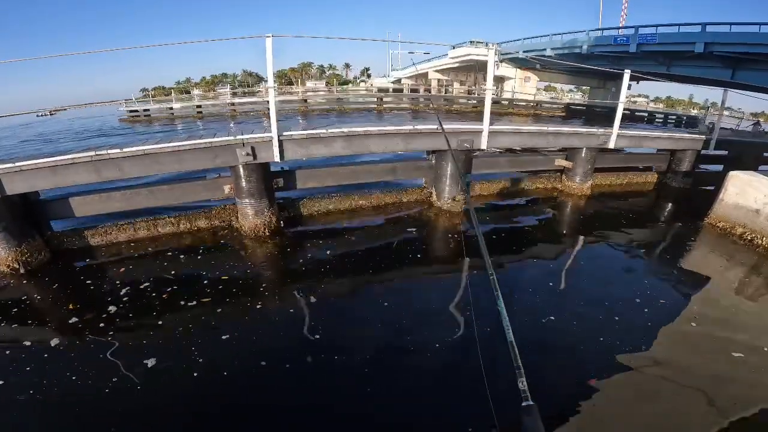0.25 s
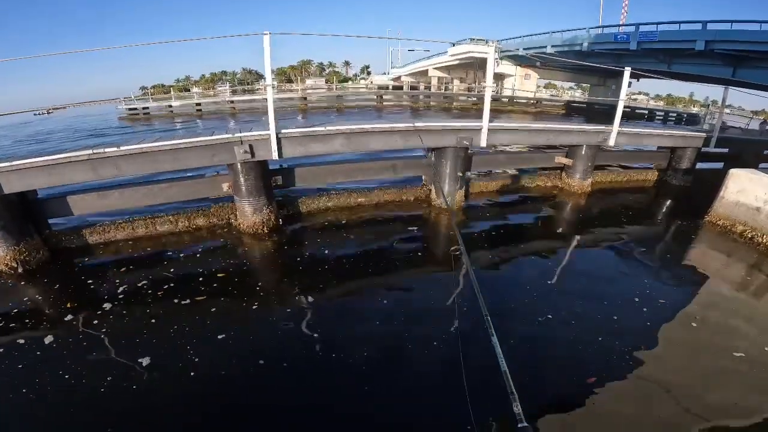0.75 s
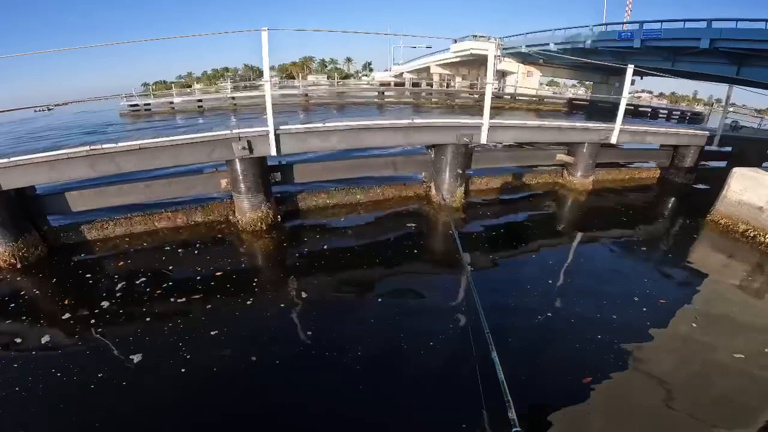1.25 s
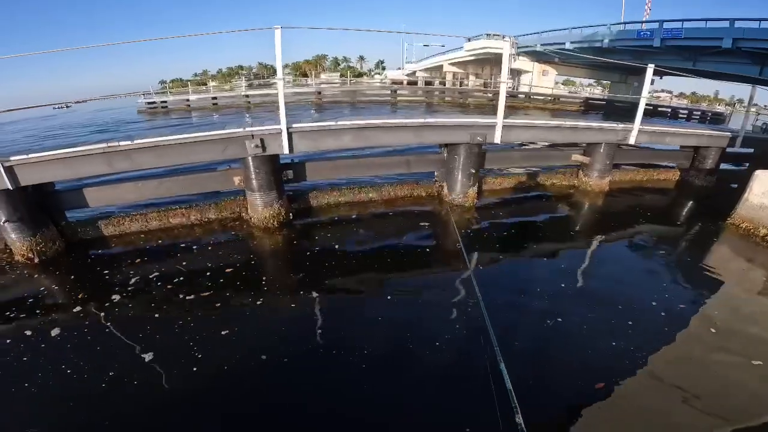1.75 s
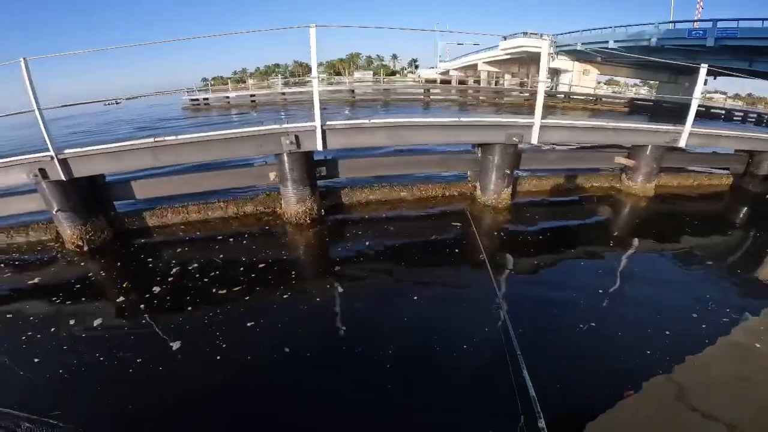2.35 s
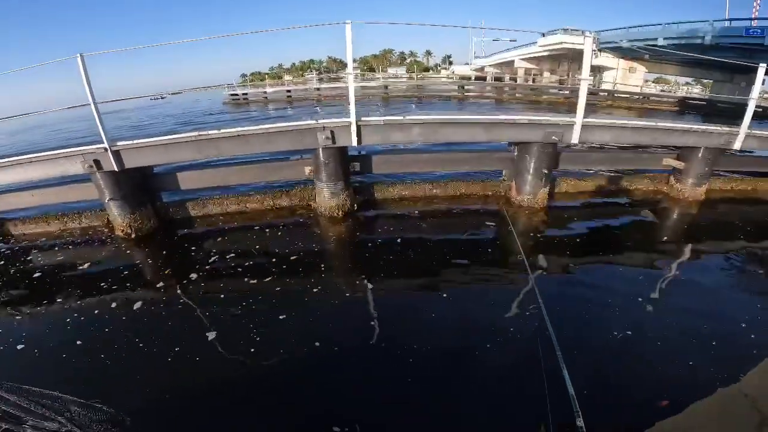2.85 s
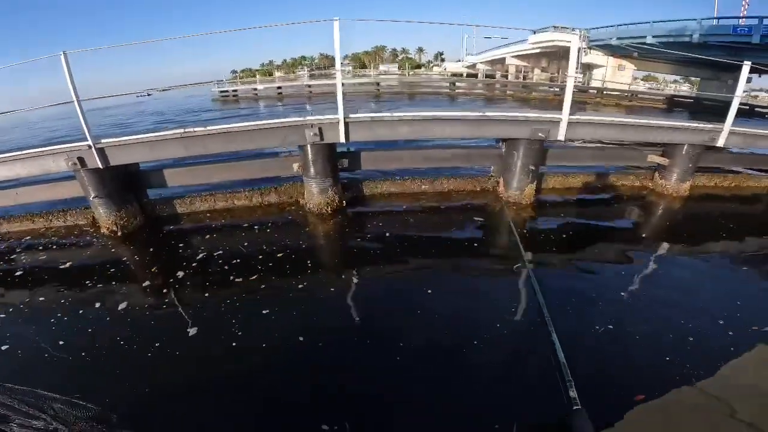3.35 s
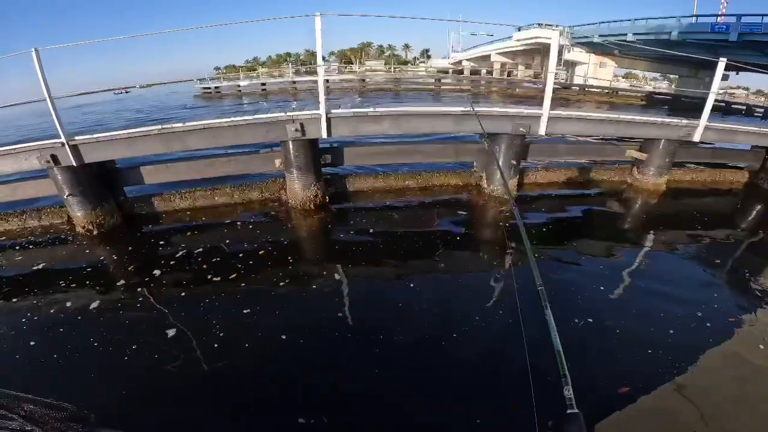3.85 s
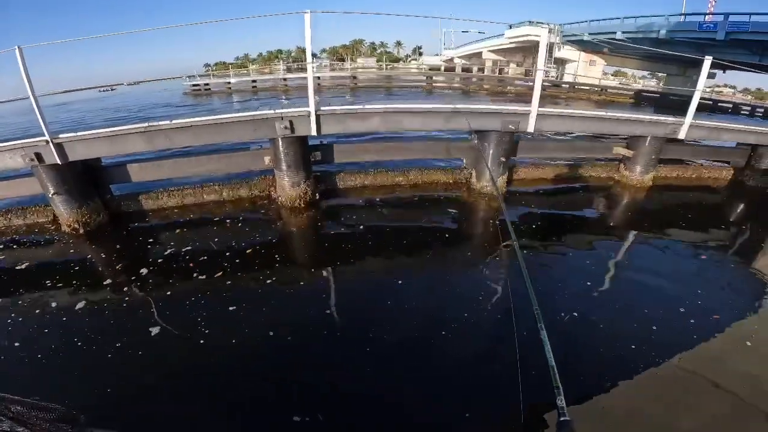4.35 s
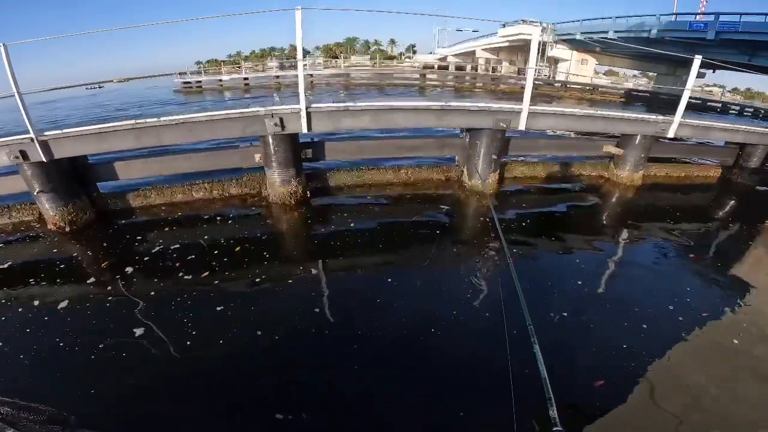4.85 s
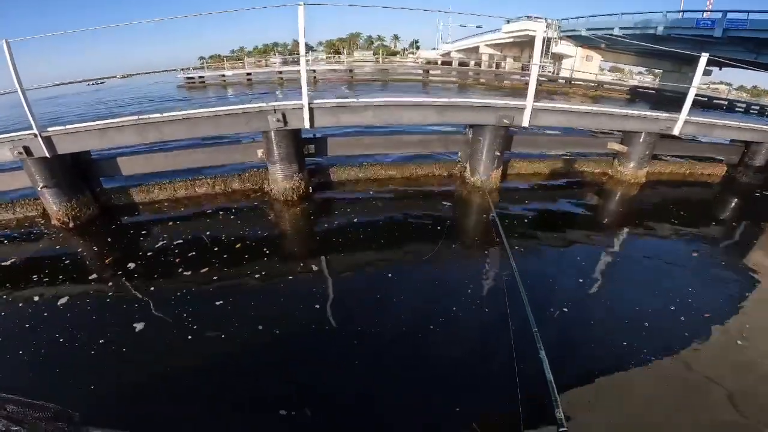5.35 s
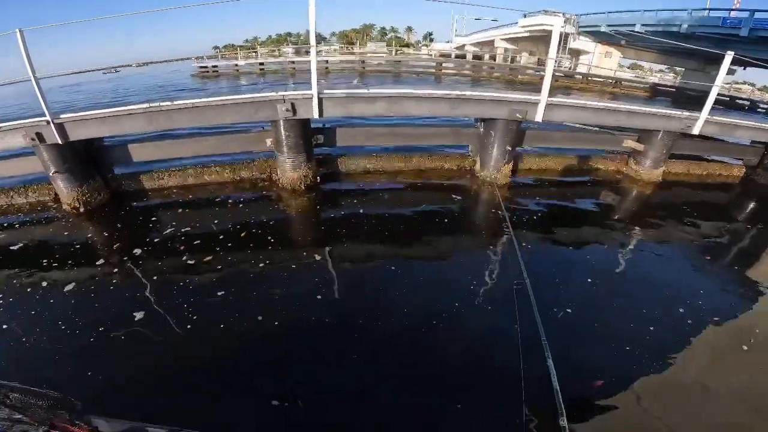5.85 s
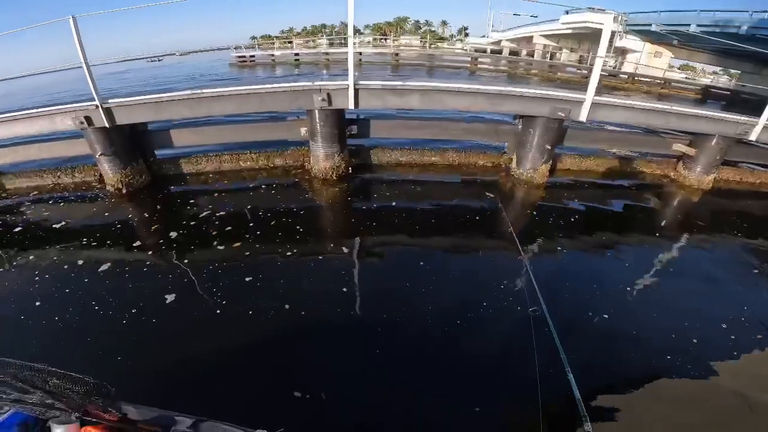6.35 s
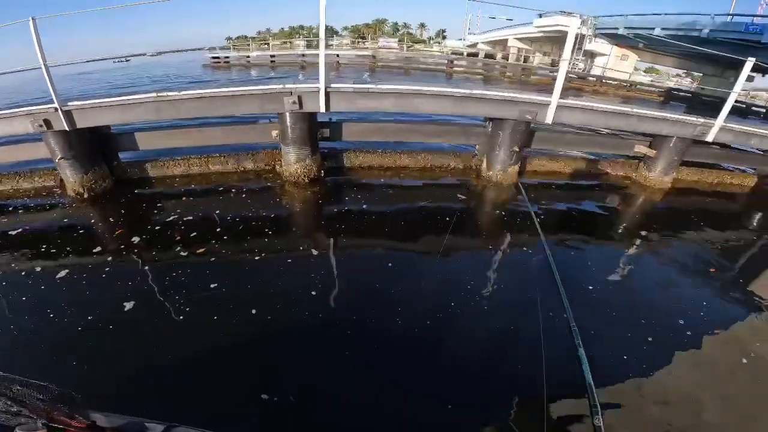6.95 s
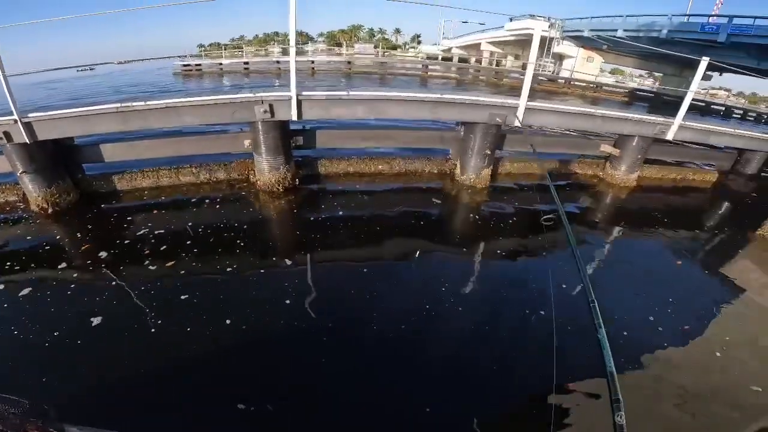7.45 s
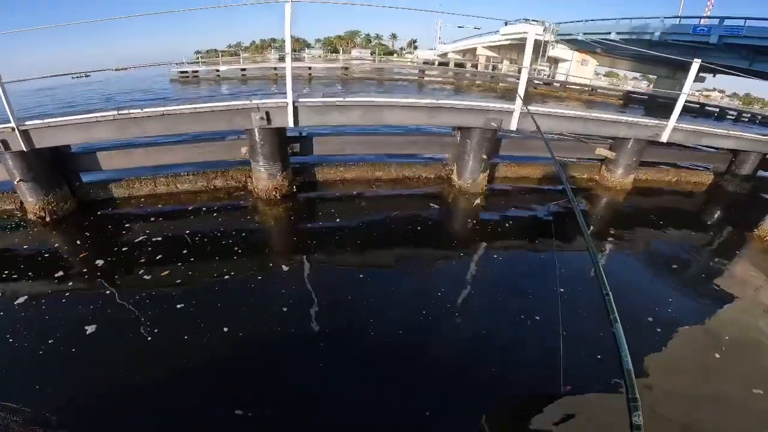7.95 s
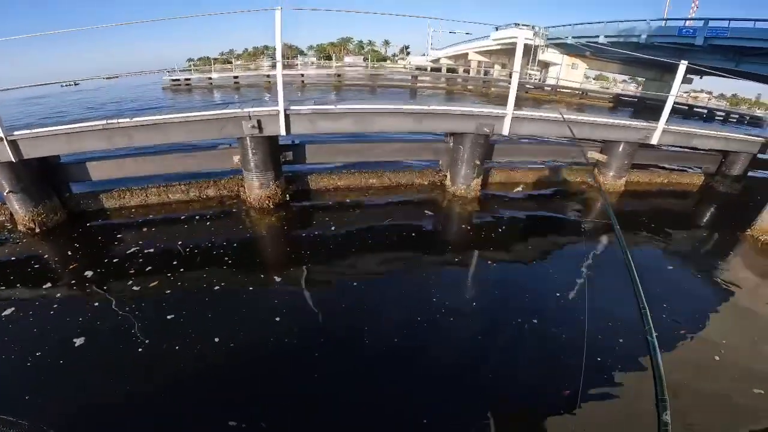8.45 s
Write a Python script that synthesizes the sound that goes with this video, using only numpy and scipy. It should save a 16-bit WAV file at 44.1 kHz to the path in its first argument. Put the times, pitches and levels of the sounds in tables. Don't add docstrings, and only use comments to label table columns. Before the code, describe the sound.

Steady bridge traffic rumbles; one car fades off, a truck bangs over a joint with quickening metallic knocks, while water plips and fishing line ticks nearby.

```python
import sys
import numpy as np
from scipy import signal
from scipy.fft import rfft, irfft, next_fast_len
from scipy.io import wavfile
from scipy.ndimage import uniform_filter1d

SR = 44100
rng = np.random.default_rng(int(sys.argv[2]) if len(sys.argv) > 2 else 0)


def master_out(mix):
    frames = np.transpose(np.atleast_2d(mix))
    ceiling = np.clip(frames, -1, 1)
    pcm = np.round(ceiling * 32767).astype(np.int16)
    wavfile.write(sys.argv[1], SR, pcm)


def gain_from_decibels(decibels):
    exponent = np.asarray(decibels, float) / 20
    return 10 ** exponent


N = 383260
FFT_N = next_fast_len(N)
HZ = np.fft.rfftfreq(FFT_N, 1 / SR)
TIME = np.arange(N) / SR

# time in seconds, load on the deck in dB, nearness in dB.
FAR_PASS = [
    (0, -4, -3.5),
    (2.5, -2, 0),
    (3.2, -0.5, -1),
    (3.75, 1.5, 0),
    (4.3, -3, -.5),
    (4.9, -0.5, 0),
    (5.6, -5, -.5),
    (6.4, -3, 0),
    (8.69, -0.5, 0),
]
CAR_PASS = [
    (0, -0.5, 1),
    (.5, 1, 1),
    (1.1, -3.5, 0),
    (1.9, 0, 0),
    (2.2, 3.5, -4.5),
    (2.6, -6, -13),
    (2.95, -3, -22),
    (3.2, -19, -32),
    (3.4, -22, -35),
]
TRUCK_PASS = [
    (6.63, -22, -17),
    (6.665, -14.5, -5.5),
    (6.85, -6.5, -3.5),
    (7.12, -1.5, -0.5),
    (7.3, -7, -1),
    (7.7, -9, -1),
    (8.3, -2.5, -1),
    (8.5, -4, -5),
    (8.69, -2.5, -12.5),
]

# frequency in Hz, level in dB per Hz.
FAR_ROAR = [(12, -44), (20, -14), (32, -4.5), (60, -9), (91, -9), (117, -4), (141, -14), (396, -24.5),
            (469, -27.5), (828, -28), (920, -24.5), (3050, -38.5), (3960, -57.5), (6710, -120)]
CAR_ROAR = [(12, -33), (20, -8.5), (115, -0.5), (167, -9), (207, -16.5), (244, -12.5), (357, -20),
            (413, -18), (617, -16.5), (777, -21), (1800, -32.5), (3050, -57), (3960, -71), (6710, -120)]
TRUCK_ROAR = [(12, -39.5), (20, -8), (65, -1.5), (141, 1), (215, -12.5), (283, -13), (349, -13),
              (500, -13.5), (567, -12), (617, -12.5), (1730, -24.5), (3050, -53), (3960, -70.5),
              (6710, -120)]
# frequency in Hz, level in dB per Hz.
FAR_HISS = [(2000, -22), (2600, -12), (3200, -9.5), (4000, -12.5), (5500, -16.5), (7600, -21), (8200, -28),
            (10200, -29.5), (11200, -33), (12200, -37), (13500, -36.5), (14000, -51), (14600, -71.5)]
CAR_HISS = [(2000, 9), (2600, -3.5), (3200, -12.5), (4700, -14), (5500, -19), (7600, -26.5), (8200, -31.5),
            (10200, -32.5), (11200, -37), (12200, -36), (13500, -40), (14100, -48), (14700, -69)]
TRUCK_HISS = [(2000, 20), (2600, 3), (3200, -9), (4700, -10.5), (5500, -17), (7600, -27), (8200, -35),
              (10200, -46.5), (13500, -51), (14500, -70.5)]
# frequency in Hz, width in Hz, level in dB.
FAR_HUM = [(930, 85, 0), (705, 70, -4)]
CAR_HUM = [(133, 20, -0.5), (207.3, 15.5, -4), (413.6, 25, -9), (607, 52, -14), (310.4, 15, -12)]
TRUCK_HUM = [(144, 31, 0), (285.4, 46, 1), (434, 45, -4.5), (569, 40, -6.5), (953, 130, -11.5),
             (1763, 73, -15)]
# level in dB at nearness 0, share of nearness, lag in seconds, drift in dB per second.
FAR_MIX = [(-42, 1.6, 0.01, 0.15), (-60.5, 1, 0.01, -0.1), (-58, 0.64, 0.21, 1.05)], -32
CAR_MIX = [(-35.5, 1.42, 0.01, 0.027), (-57.5, 2.1, 0.38, -0.38), (-36.5, 0.75, 0.01, 0.035)], -25.5
TRUCK_MIX = [(-29, 1.09, 0.012, .01), (-53, 1.1, 0.07, 2.86), (-32.5, 1.8, 0.19, 1.7)], -20.5

# frequency in Hz, likeness from 0 to 1, left lead in radians, left over right in dB.
WIDE_PORTS = [(40, .999, 0, 0), (140, .998, 0, 0), (260, .985, 0, -.1), (410, .95, .1, .1),
              (940, .93, .3, .4), (1730, .86, .55, .1), (2900, .6, 1.1, -.2), (3800, .53, .4, -1.6),
              (4900, .72, .05, -1.5), (6500, .72, -.2, .5), (8400, .5, -.4, 1.3), (10000, .78, -.1, 1.1),
              (11500, .5, -.1, 2.5), (12600, .1, -.1, 5)]
NEAR_PORTS = [(40, .999, 0, 0), (100, .9996, 0, 0), (180, .999, 0, -.3), (410, .995, .05, -1.2),
              (650, .99, .05, -1.4), (940, .98, .12, -.6), (1730, .93, .6, -.6), (2300, .85, 1.05, -1.9),
              (2900, .68, 1.1, -2.5), (3800, .75, .4, -3), (4900, .94, .12, -1.5), (6500, .93, .02, -.8),
              (10700, .88, .02, .5), (13200, .2, .1, 4)]

# time in seconds, thump in dB, clank in dB, clank in Hz.
JOINT_HITS = [(6.556, -23.5, -46, 760), (6.660, -18.5, -31, 720), (6.739, -42, -35, 600),
              (6.753, -19, -40, 800), (6.785, -42, -30, 680), (6.821, -13, -40, 650),
              (6.872, -30, -35, 550), (6.927, -20, -24, 620), (6.945, -14, -45, 650),
              (6.982, -30, -30, 580), (7.0, -15.5, -41, 600), (7.03, -30, -31, 600), (7.069, -23, -29, 580),
              (7.16, -22, -30, 570), (7.216, -35, -30, 550), (7.275, -21, -33, 550)]
# middle in seconds, half length in seconds, frequency in Hz, level in dB.
BOOMS = [(.5, .5, 47.8, -40), (1.15, 0.061, 45.3, -28.5), (2.7, 0.56, 47.66, -31.5),
         (6.88, 0.21, 48.6, -33), (7.55, .22, 48, -28.5), (7.98, 0.14, 47, -30), (8.55, 0.22, 50.4, -29.5),
         (.8, 0.23, 60.3, -32), (2.75, 0.31, 63.4, -34.5), (4.35, 0.53, 62.17, -34),
         (5.3, 0.77, 61.4, -38.5), (6.15, .2, 61.3, -37), (6.95, 0.12, 59.5, -24.5),
         (7.3, 0.21, 60.5, -27.5), (7.92, 0.099, 62.3, -29), (.2, 0.23, 75.6, -32.5), (.94, 0.075, 75, -24),
         (1.4, 0.28, 75.3, -32.5), (2.3, 0.091, 75, -34), (5.45, 0.26, 73.1, -36.5),
         (6.05, 0.31, 74.2, -35.5), (7.0, 0.32, 75.2, -31), (7.55, 0.42, 75.1, -31.5),
         (.85, 0.18, 114.4, -28.5), (1.85, 0.44, 112, -33), (4.55, 0.28, 110.9, -36),
         (5.2, 0.32, 113.1, -36), (6.05, 0.17, 112.7, -33), (6.95, 0.26, 113.3, -29),
         (8.1, 0.97, 110.3, -37.5), (3.1, .12, 75.5, -40), (3.55, 0.25, 76.5, -41), (4.5, .5, 75.2, -39.5),
         (6.52, 0.092, 76, -37.5), (3.4, .3, 113.8, -42), (4.05, 0.15, 113.5, -39), (3.92, .12, 61.3, -36),
         (6.5, .12, 112.3, -41)]
# middle and half length in seconds, frequency in Hz, level in dB.
STREAKS = [(.18, 0.11, 203, -37.5), (.62, .12, 206, -36), (.95, 0.19, 220, -38), (1.5, .18, 207, -37),
           (2.12, .12, 207, -41), (1.1, .22, 318, -42.5), (1.95, 0.14, 330, -46), (.2, 0.055, 455, -46),
           (.13, .05, 630, -41.5), (.8, 0.21, 415, -48.5), (1.55, 0.13, 412, -46.5), (.93, .06, 605, -43.5),
           (7.12, 0.14, 290, -38), (7.28, 0.044, 282, -35), (7.6, 0.16, 285, -36), (7.88, .05, 287, -33),
           (8.09, .08, 288, -33), (8.38, .08, 284, -35), (7.45, .15, 425, -40.5), (7.95, 0.072, 440, -39),
           (8.17, .05, 425, -37), (8.45, .22, 442, -39.5), (7.1, .16, 567, -36), (7.46, .08, 500, -33),
           (8.08, .08, 582, -36), (6.8, .05, 700, -41), (7.08, 0.11, 695, -41.5), (7.35, .07, 680, -39.5),
           (6.8, .06, 930, -38), (8.33, .1, 945, -44.5), (8.3, .3, 150, -32.5), (7.4, .1, 160, -33.5),
           (2.3, .35, 152, -39), (7.85, .1, 150, -33), (8.6, .1, 160, -33), (1.7, .1, 120, -34)]
# frequency in Hz, level in dB.
PART_MODES = [(2750, -3), (3020, 1), (3429, -3), (3639, -3), (3935, -6), (4690, 3), (5060, -7), (5437, -7),
              (5609, -8), (7375, -12), (7770, -13)]
# middle and half length in seconds, frequency in Hz, level in dB.
SQUEALS = [
    (8.2, .07, 4690, -67),
    (8.42, .24, 4692, -71),
    (8.27, .1, 3020, -66),
    (8.27, .08, 5060, -71),
]

# time in seconds, peak in dB, frequency in Hz, left over right in dB.
TICKS = [(0.0223, -39, 4400, -1.5), (0.1314, -47, 4170, 0.5), (0.3544, -38, 4500, 0.5),
         (0.4314, -47, 4330, -1.0), (0.5114, -48, 4050, -1.5), (0.5935, -43, 4730, -1.5),
         (1.713, -39, 3600, -3.0), (1.7973, -45, 4340, -0.5), (2.1201, -43, 4120, -3.0),
         (2.1779, -44, 3930, -4.0), (2.3655, -46, 5100, -1.5), (2.3655, -53, 7300, -1.5),
         (2.3745, -41, 5170, -2.5), (2.4608, -39, 3740, 4.5), (2.5157, -43, 4740, 2.0),
         (2.5341, -46, 3770, 4.5), (2.5621, -42, 3700, 2.0), (2.5625, -43, 5300, 2.0),
         (1.7135, -40, 4700, -3.0), (1.7265, -46, 4500, -1.0), (6.135, -38, 2550, 0), (6.359, -34, 2150, 0),
         (3.876, -44, 2750, -1), (3.92, -49, 3600, -1), (2.4608, -41, 2600, 4), (0.2638, -51, 7200, 1.5),
         (4.972, -48, 7600, -1.5), (3.3744, -48, 4000, -1.0), (3.4984, -40, 4940, -4.0),
         (3.5114, -45, 4890, -3.5), (3.9404, -38, 3400, -3.5), (3.9484, -46, 4200, -1.0),
         (4.6882, -40, 4950, -3.0), (4.8604, -42.5, 6110, -3.5), (4.8674, -46, 4800, 0.0),
         (4.9594, -51, 5960, 0.0), (4.9721, -42, 5830, -3.0), (4.9834, -50, 5510, -1.0),
         (5.3253, -47, 3860, -3.0), (5.4106, -50, 4770, -1.0), (5.7972, -50, 5000, -1.0),
         (5.9189, -46, 4440, -1.5)]
# time in seconds, peak in dB, frequency in Hz, left over right in dB.
SNAPS = [(0.1989, -61, 9950, 3.5), (0.3092, -57, 13300, 5.0), (0.4894, -64, 9660, 1.5),
         (0.6828, -63, 11700, 1.5), (0.8714, -57, 10000, 0.5), (0.9777, -58, 10300, 0.5),
         (1.1767, -57, 10500, 0.5), (1.2394, -61, 13500, 1.5), (2.159, -60, 10100, 2.5),
         (2.4894, -63, 9610, 4.0), (2.5294, -61, 13500, 4.5), (2.5616, -61, 10300, 6.0),
         (2.7716, -59, 13000, 3.5), (2.9916, -60, 10000, 0.5), (3.9404, -60, 10400, -0.5),
         (4.6894, -67, 10100, 2.5), (4.8234, -59, 10700, 0.5), (4.9726, -61, 10900, 0.5),
         (5.021, -58, 10600, 0.5), (5.1612, -58, 10200, 0.5), (5.3662, -60, 9920, 1.5),
         (5.8431, -63, 10100, 1.0)]
# time in seconds, peak in dB, frequency in Hz, left over right in dB.
PLIPS = [(3.697, -33, 1150, 0), (3.75, -35, 1100, 0), (3.922, -47, 2650, -1), (3.95, -36, 1350, 0),
         (4.0, -33, 1050, 0), (5.051, -39, 2160, -.5), (5.085, -37, 1050, .5), (5.095, -37, 1080, .5),
         (5.12, -40, 1500, 0), (2.449, -47, 2350, 3), (2.482, -49, 2400, 3), (3.76, -39, 1550, 0),
         (3.875, -36, 950, 0), (4.012, -41, 1950, 0), (3.62, -36, 900, 0), (1.027, -33, 700, -1)]

THUMP_HZ, THUMP_S, CLANK_S, CLANK_RISE_S = 71, 0.13, 0.1, 0.0037
KNOCK_FIRST_S, KNOCK_GAP_S, KNOCK_COUNT = 7.107, 0.0665, 25
KNOCK_HURRY_S = 8.8e-5
KNOCK_DB, RATTLE_DB = -56.5, -18
KNOCK_RISE_DB_PER_S, KNOCK_SHARE, KNOCK_SCATTER_DB = 12, 1.1, 1.8
TRUCK_GLIDE_PER_S, GLIDE_MIDDLE_S = 0.03, 7.8
TICK_LAG_S = 0.001


def traffic():
    far = vehicle(FAR_PASS, FAR_MIX, FAR_ROAR, FAR_HISS, FAR_HUM, WIDE_PORTS, 170, rumble_db=-2.0)
    car = vehicle(CAR_PASS, CAR_MIX, CAR_ROAR, CAR_HISS, CAR_HUM, NEAR_PORTS, 182, rumble_db=-5.5)
    truck = vehicle(TRUCK_PASS, TRUCK_MIX, TRUCK_ROAR, TRUCK_HISS, TRUCK_HUM, NEAR_PORTS, 181,
                    rumble_db=-2.5, glide=TRUCK_GLIDE_PER_S)
    car *= np.clip((3.5 - TIME) / 0.22, 0, 1)
    truck *= np.clip((TIME - 6.52) / 0.048, 0, 1)
    return patchy(far + car + truck, patch_db=0.99, gust_db=0.81, rustle_db=3.0)


def vehicle(rows, mix, roar_colour, hiss_colour, hum, port_table, low_hz, rumble_db, glide=0):
    z = ports(port_table, rfft(rng.standard_normal(FFT_N)))
    low = 1 / (1 + (HZ / low_hz) ** 4)
    high = 1 - 1 / (1 + (HZ / 2600) ** 8)
    colour = z * gain_from_decibels(read(roar_colour, HZ)[0])
    lines = sum(gain_from_decibels(db) / np.sqrt(w) / (1 + (2 * (HZ - f) / w) ** 2) for f, w, db in hum)

    load_db, near_db = played(rows)
    since = TIME - rows[0][0]
    follow, deck_db = mix
    roar, hiss, grating = (gain_from_decibels(db + share * np.interp(TIME - lag, TIME, near_db) + drift_db * since)
                           for db, share, lag, drift_db in follow)

    noise = gain_from_decibels(rumble_db + deck_db + load_db) * heard(colour * low)
    noise += roar * heard(colour * (1 - low - high))
    noise += hiss * heard(z * high * gain_from_decibels(read(hiss_colour, HZ)[0]))
    hurried = TIME + glide / 2 * ((TIME - GLIDE_MIDDLE_S) ** 2 - 1)
    hum_pair = np.array([np.interp(hurried, TIME, c) for c in heard(z * lines * 1j)])
    return noise + gain_from_decibels(1.5) * grating * hum_pair


def patchy(x, patch_db, gust_db, rustle_db):
    hz, t, z = signal.stft(x, SR, nperseg=512)
    hz = hz[:, None]
    field = rng.standard_normal((2, *z.shape[1:]))
    patches = evened(uniform_filter1d(uniform_filter1d(field[0], size=5, axis=0), size=10, axis=1))
    patches = patches * np.clip(hz / 300, 0, 1)
    tufts = evened(uniform_filter1d(uniform_filter1d(field[1], size=22, axis=0), size=9, axis=1))
    gusts = evened(uniform_filter1d(rng.standard_normal(len(t)), size=7)) * np.clip(hz / 4000, 0, 1)
    top = np.clip(hz / 12000, 0, 1) ** 2 * np.maximum(tufts - 0.5, 0)
    change_db = patch_db * patches + gust_db * gusts + rustle_db * top
    return signal.istft(z * gain_from_decibels(change_db), SR, nperseg=512)[1][:, :N]


def joint():
    out, t = np.zeros(N), np.arange(8000) / SR
    for s, thump_db, clank_db, hz in JOINT_HITS:
        thump = gain_from_decibels(thump_db - 60 * t / THUMP_S) * np.sin(2 * np.pi * THUMP_HZ * t)
        plates = evened(signal.lfilter(*signal.iirpeak(hz, 1.8, SR), rng.standard_normal(len(t))))
        clank = plates * gain_from_decibels(clank_db - 60 * t / CLANK_S) * np.minimum(t / CLANK_RISE_S, 1)
        out[round(s * SR):][:len(t)] += thump + clank
    dull = signal.sosfilt(signal.butter(4, 1200, fs=SR, output="sos"), out)
    return dull * gain_from_decibels(np.array([[-0.3], [0.3]]))


def swells(rows, waver_hz, throb_db):
    out = np.zeros((2, N))
    wavers = [(np.cumsum(waver_hz * slow(8.0)) / SR, throb_db * slow(9.0)) for _ in range(4)]
    for k, (s, half_s, hz, db) in enumerate(rows):
        part = slice(max(round((s - 2 * half_s) * SR), 0), round((s + 2 * half_s) * SR))
        turns, throb = (w[part] for w in wavers[k % len(wavers)])
        t = TIME[part] - s
        balance = gain_from_decibels(np.array([[0.5], [-0.5]]) * read(NEAR_PORTS, hz)[2])
        swell = np.exp(-abs(t / half_s) ** 2.4) * balance
        out[:, part] += np.sqrt(2) * swell * gain_from_decibels(db + throb) * np.sin(2 * np.pi * (hz * t + turns))
    return out


def knocks():
    burst, t, k = np.zeros(N), np.arange(4000) / SR, np.arange(KNOCK_COUNT)
    at = KNOCK_FIRST_S + KNOCK_GAP_S * k - KNOCK_HURRY_S * k ** 2
    near_db = np.interp(at, TIME, played(TRUCK_PASS)[1])
    force_db = KNOCK_DB + KNOCK_RISE_DB_PER_S * (at - at[0]) + KNOCK_SHARE * near_db
    for s, db in zip(at, force_db + KNOCK_SCATTER_DB * rng.standard_normal(len(k))):
        part = burst[round(s * SR):][:len(t)]
        part += (gain_from_decibels(db - 60 * t / 0.15) * np.minimum(t / 0.003, 1))[:len(part)]
    burst += gain_from_decibels(np.interp(TIME, [at[0] - KNOCK_GAP_S, *at], [-np.inf, *force_db]) + RATTLE_DB)

    z = rfft(burst * rng.standard_normal(N), FFT_N)
    modes = gain_from_decibels(8.5) * sum(gain_from_decibels(db) / (1 + 2j * (HZ - f) / 45) ** 2 for f, db in PART_MODES)
    clatter = gain_from_decibels(-6.0) / (1 + ((HZ - 4500) / 2400) ** 4)
    _, lead, balance_db = read(NEAR_PORTS, HZ)
    pair = np.array([gain_from_decibels(balance_db / 2), np.exp(-1j * lead) / gain_from_decibels(balance_db / 2)])
    return irfft(z * pair * (modes + clatter), FFT_N)[:, :N]


def exhaust():
    swell = np.exp(-((TIME - 2.45) / 0.6) ** 2)
    return gain_from_decibels(-31.0) * swell * np.sin(2 * np.pi * np.cumsum(131 + 1.75 * slow(3.03)) / SR)


def ticks(rows, ring_s, level_db, rise_s, glide):
    out, t = np.zeros((2, N)), np.arange(1800) / SR
    for s, db, hz, pan_db in rows:
        direct = ring(hz, ring_s, len(t), rise_s, glide)
        scatter = rng.standard_normal((2, len(t))) * gain_from_decibels(-23 - 60 * t / 0.04)
        both = direct + signal.oaconvolve(scatter, direct[None])[:, :len(t)]
        level = gain_from_decibels(db + level_db + np.array([[pan_db / 2], [-pan_db / 2]]))
        out[:, round((s + TICK_LAG_S) * SR):][:, :len(t)] += level * both
    return out


def ring(hz, ring_s, count, rise_s=0.0002, glide=0.1):
    t = np.arange(count) / SR
    tone = np.sin(2 * np.pi * hz * t * (1 + glide * t / ring_s))
    return tone * gain_from_decibels(-60 * t / ring_s) * np.minimum(t / rise_s, 1)


def crackle(per_s, level_db):
    out = np.zeros((2, N))
    chance = per_s / SR * gain_from_decibels(9.2 * slow(5.0) - 0.63 * TIME)
    for hz in np.geomspace(5500, 13500, num=10):
        size = (rng.random(N) < chance) * gain_from_decibels(2.9 * np.minimum(rng.exponential(1, N), 4))
        grain = ring(hz, 22 / hz, count=300) * gain_from_decibels(read(FAR_HISS, hz)[0] + 21.0)
        pan_db = rng.uniform(0, 3)
        out += gain_from_decibels(np.array([[pan_db], [-pan_db]])) * signal.oaconvolve(size, grain)[:N]
    return gain_from_decibels(level_db) * out


def ports(table, left):
    same, lead, balance_db = read(table, HZ)
    other = abs(left) * np.exp(2j * np.pi * rng.random(len(HZ)))
    right = same * left * np.exp(-1j * lead) + np.sqrt(1 - same ** 2) * other
    return np.array([left * gain_from_decibels(balance_db / 2), right / gain_from_decibels(balance_db / 2)])


def heard(z):
    return evened(irfft(z, FFT_N)[:, :N])


def slow(hz):
    z = rfft(rng.standard_normal(FFT_N))
    return evened(irfft(z / (1 + (HZ / hz) ** 4), FFT_N)[:N])


def evened(x):
    return x / np.sqrt(np.mean(x ** 2) + 1e-20)


def read(points, hz):
    f, *columns = np.transpose(points)
    return [np.interp(np.log(hz + 1), np.log(f + 1), c) for c in columns]


def played(rows):
    s, *columns = np.transpose(rows)
    return [np.interp(TIME, s, c) for c in columns]


def scene():
    girders = swells(BOOMS, waver_hz=1.6, throb_db=2.5)
    grating = swells(STREAKS, waver_hz=6.0, throb_db=3.5)
    squeal = swells(SQUEALS, waver_hz=12, throb_db=3)
    bridge = traffic() + joint() + girders + grating + knocks() + squeal + exhaust()
    line = ticks(TICKS, 0.004, 7.5, 0.0005, 0) + ticks(SNAPS, 0.002, 8, 0.0002, 0.05)
    water = ticks(PLIPS, 0.04, 2, 0.004, 0.12)
    return bridge + line + water + crackle(per_s=6.3, level_db=-59.5)


def top_cut(x):
    return signal.sosfilt(signal.butter(12, 15400, fs=SR, output="sos"), x)


def record(dry):
    from_ends = np.minimum(np.arange(N) + 100, N - np.arange(N))
    ramps = np.clip(0.2 + from_ends / 150, 0, 1)
    return top_cut(dry * ramps)


dry = scene()
out = record(dry)
master_out(out)
```